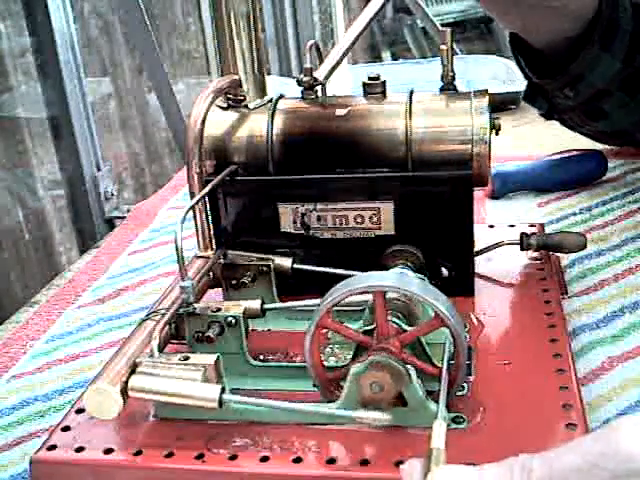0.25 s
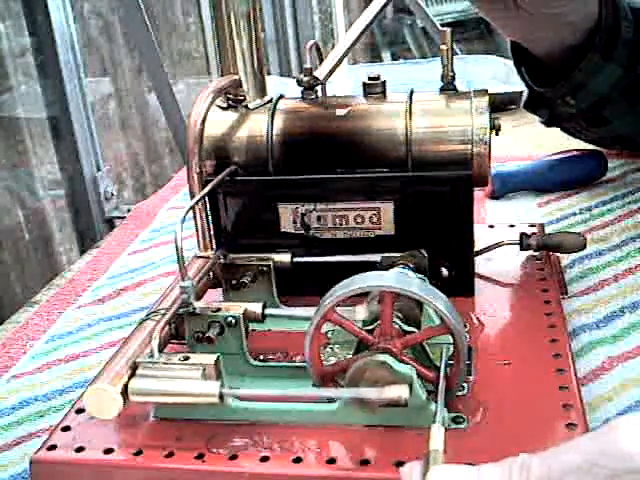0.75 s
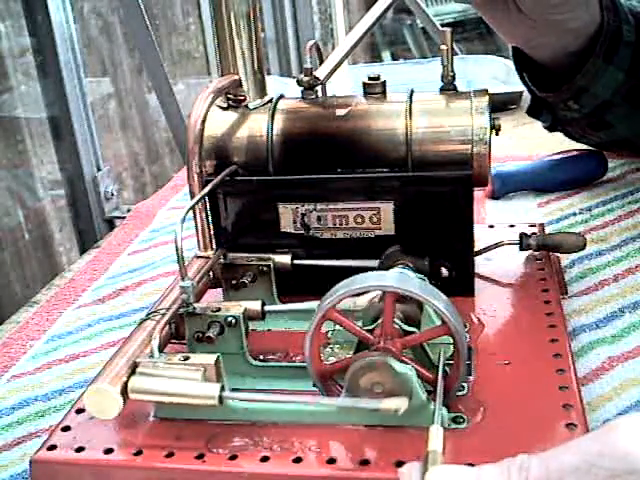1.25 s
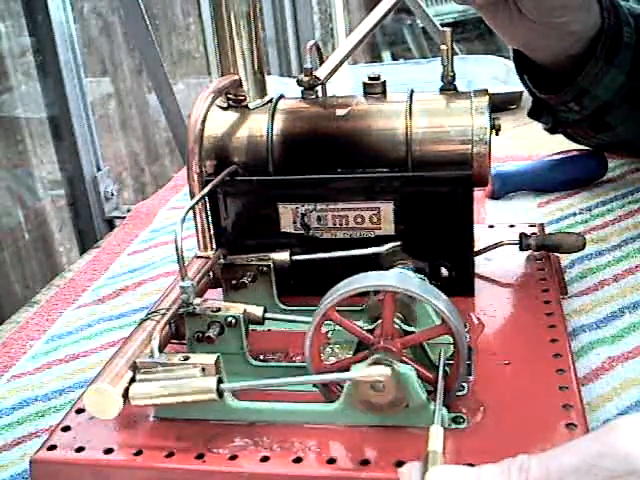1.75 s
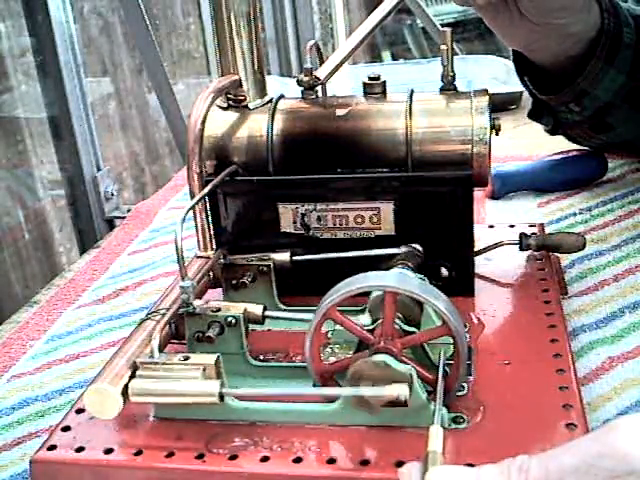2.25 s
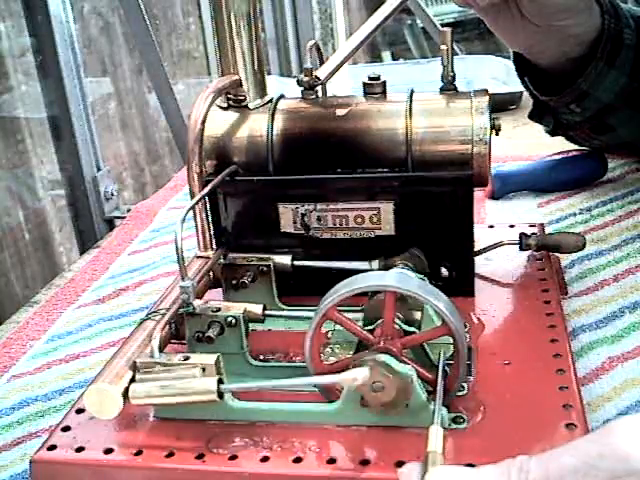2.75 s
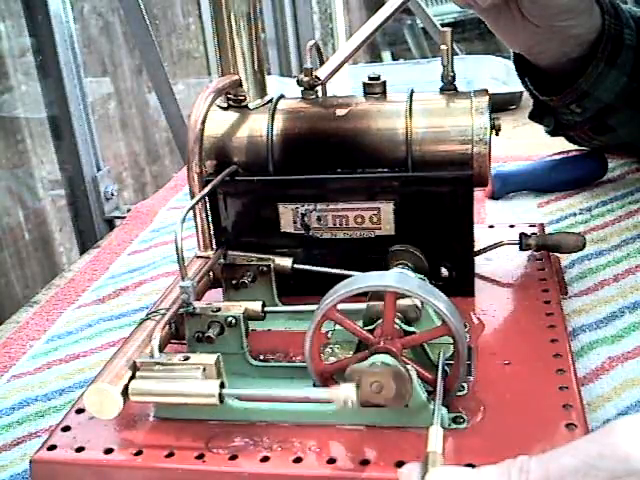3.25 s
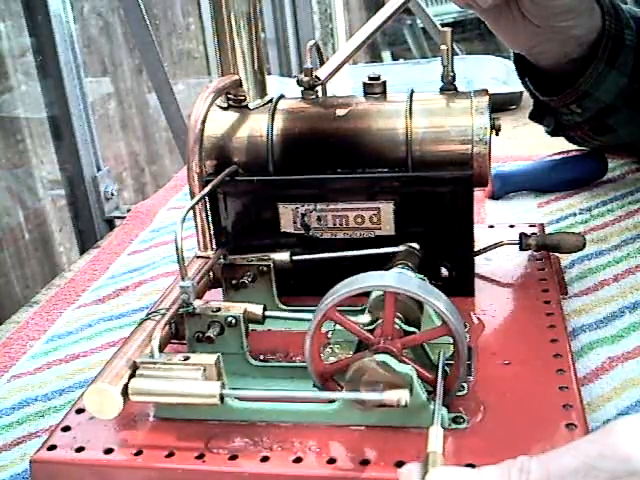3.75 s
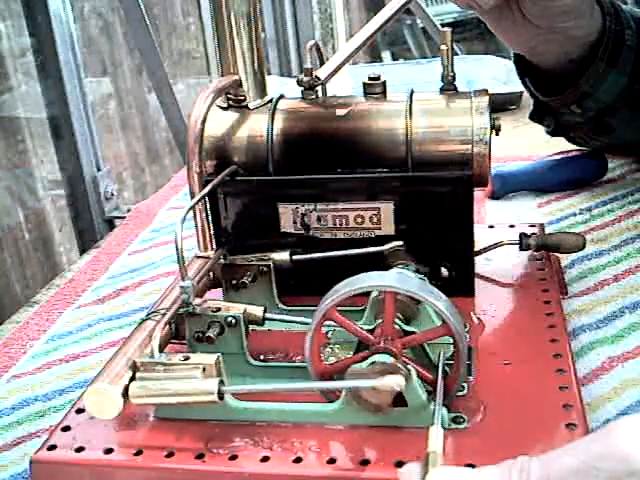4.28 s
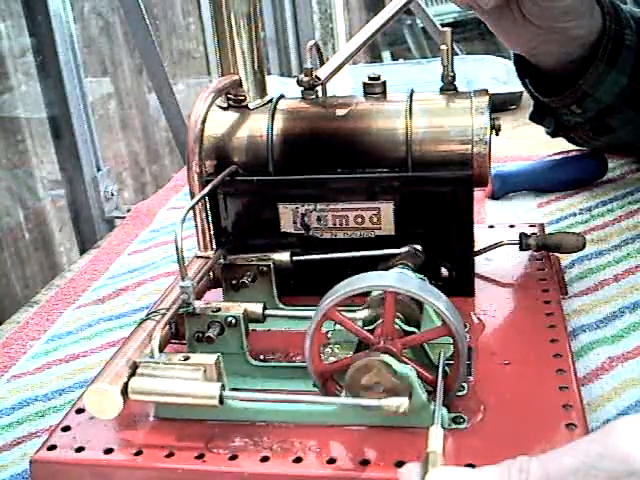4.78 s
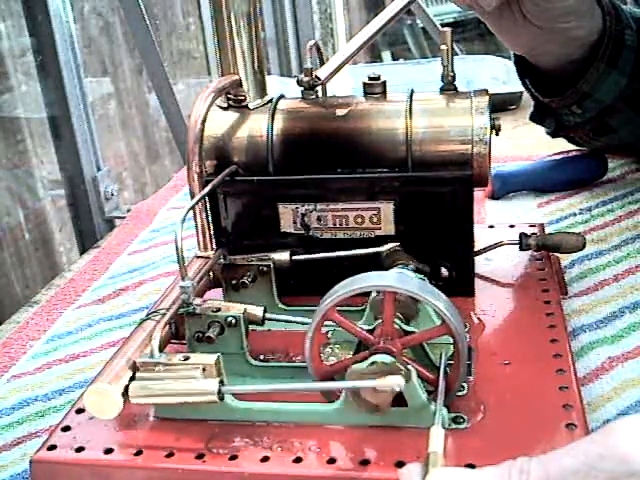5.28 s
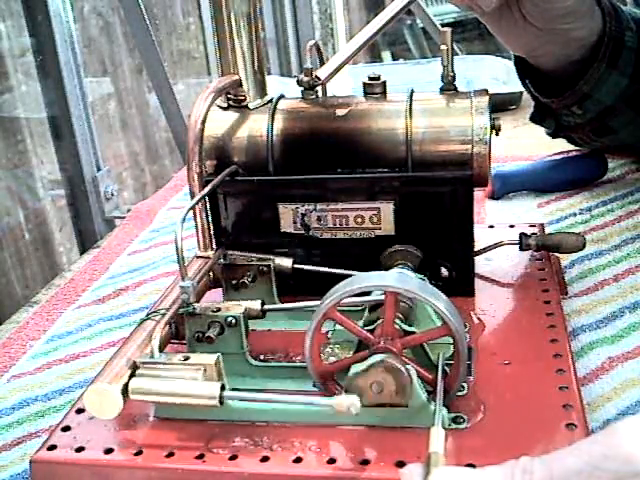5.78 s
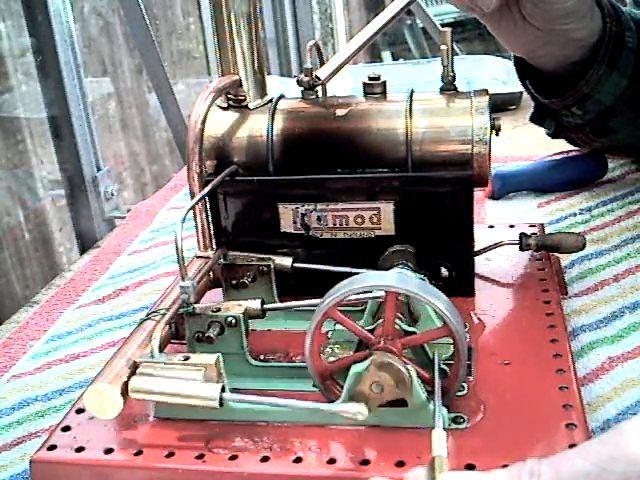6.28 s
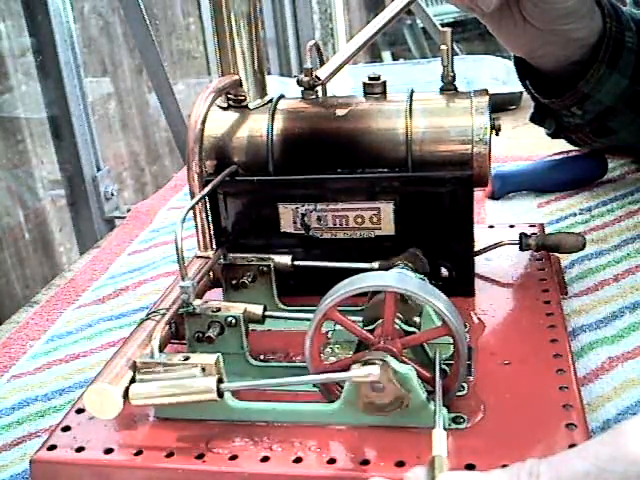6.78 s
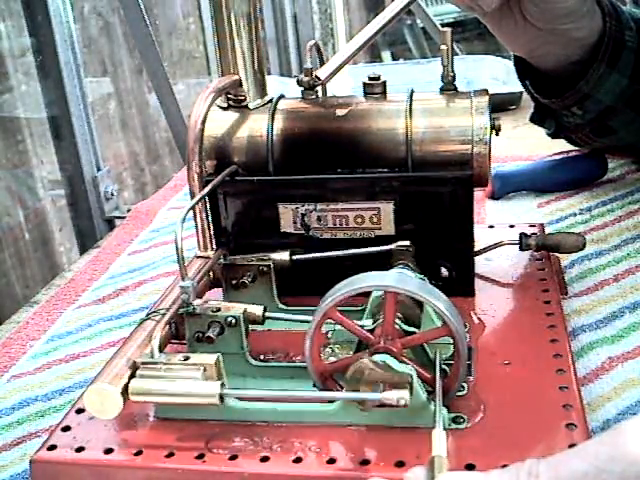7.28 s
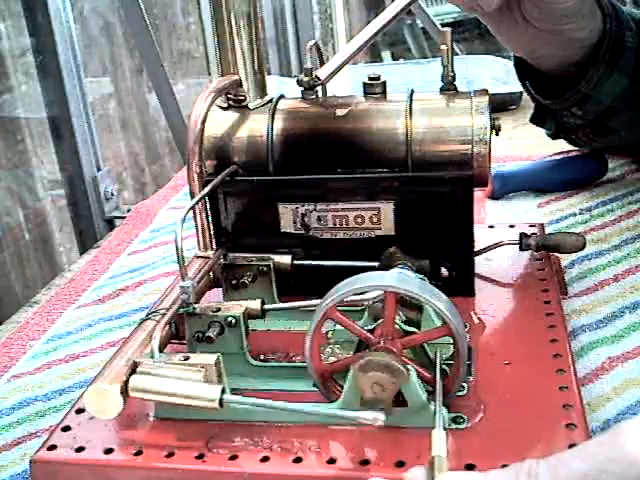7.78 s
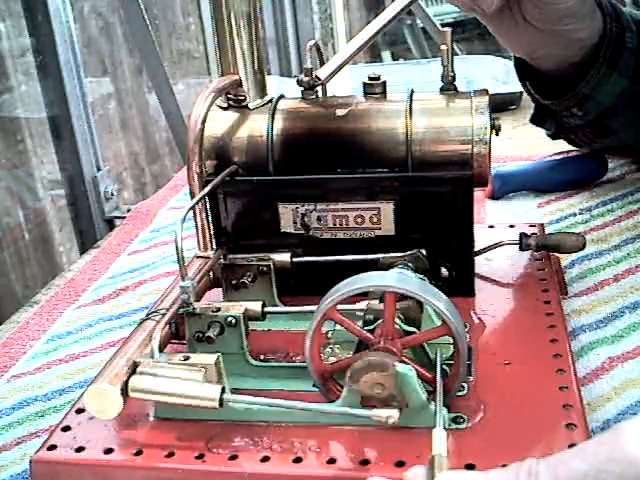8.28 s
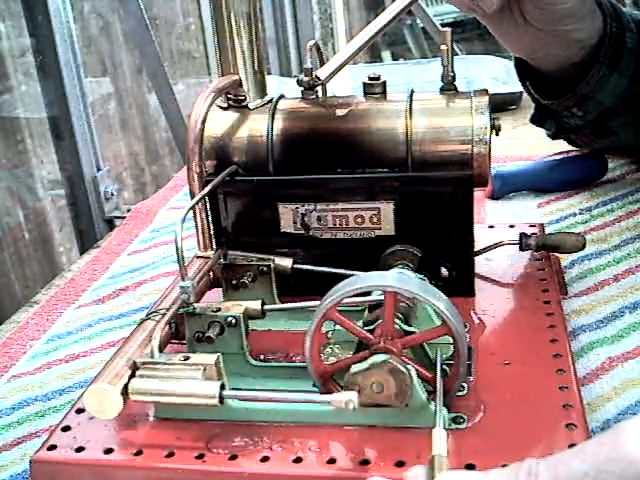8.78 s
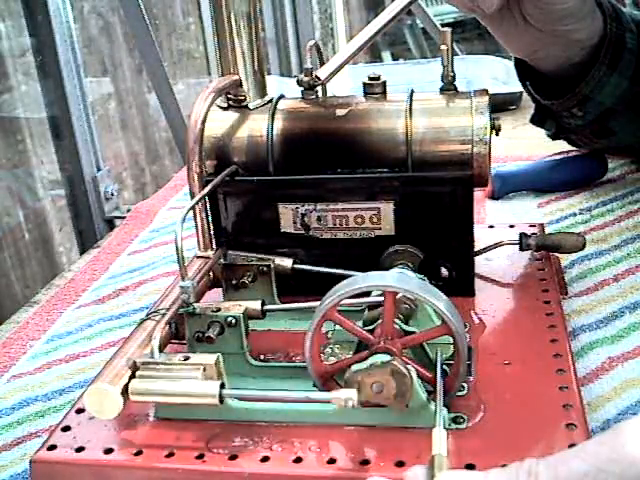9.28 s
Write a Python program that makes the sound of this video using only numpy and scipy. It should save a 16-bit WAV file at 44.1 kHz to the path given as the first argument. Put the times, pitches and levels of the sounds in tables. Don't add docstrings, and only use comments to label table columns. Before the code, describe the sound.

A toy steam engine on a sheet-metal base runs very fast at first, a loud buzzing rattle with metallic ringing and hissing steam, distorted at the close microphone. After about a second it slows continuously; the buzz breaks into rapid chugging, then separate uneven clacks and brass ticks. Soft low table thuds come near four seconds. Small dry shed.

```python
import sys
import numpy as np
from scipy import signal
from scipy.io import wavfile
from scipy.ndimage import uniform_filter1d

SR = 44100
rng = np.random.default_rng(int(sys.argv[2]) if len(sys.argv) > 2 else 0)


def store_wav(level_fs):
    pcm = np.round(np.clip(np.atleast_2d(level_fs), -1, 1) * 32767)
    wavfile.write(sys.argv[1], SR, pcm.T.astype(np.int16))


def gain_from_db(level_db):
    decades = np.asarray(level_db, float) / 20
    return 10 ** decades


N = 420271
START_TURNS, FULL_SPEED = .012, 30.5

# time_s, speed_turns_per_s
SPIN = [(0.0, 30.71), (1.06, 30.62), (1.57, 28.0), (1.98, 24.33), (2.22, 23.67), (3.1, 18.38),
        (3.72, 16.99), (4.8, 13.24), (5.0, 13.63), (5.53, 10.9), (6.13, 10.67), (6.26, 9.79), (7.11, 9.09),
        (7.48, 9.99), (8.3, 7.95), (8.65, 8.2), (8.95, 6.1), (9.53, 5.74)]
# speed_turns_per_s, head_end_turns, slide_turns, crank_end_turns
PLATE_AT = [(6, 1.01, .33, .512), (10, 1.0, .28, .505), (13, 1.025, .318, .54), (18, 1.03, .31, .59),
            (24, .995, .245, .48), (29, .97, .22, .45), (30.7, .925, .15, .5)]
# speed_turns_per_s, crosshead_turns, eccentric_turns, valve_turns
BRASS_AT = [(6, 1.032, .24, .712), (9, 1.027, .205, .697), (16.5, 1.015, .27, .673), (19, .908, .31, .665),
            (24, .9, .306, .63), (26, .872, .3, .605), (30, .83, .28, .607)]


def evened(x):
    return x / np.sqrt(np.mean(x ** 2) + 1e-20)


def curves(rows, at):
    known, *columns = np.transpose(rows)
    return [np.interp(at, known, column) for column in columns]


def spin():
    t = np.arange(N) / SR
    speed = curves(SPIN, t)[0]
    return t, speed, START_TURNS + np.cumsum(speed) / SR


def law(speed, full_db, halving_db):
    return gain_from_db(full_db + halving_db * np.log2(speed / FULL_SPEED))


def beat(places, first_db, second_db, lag_turns, width_turns, second_share=1):
    _, speed, turns = spin()
    lag, width = np.sqrt(speed / FULL_SPEED) * np.array([[lag_turns], [width_turns]])
    first, _, last = curves(places, speed)
    angle = 2 * np.pi * (turns - lag - np.array([first, last]))
    first_swell, second_swell = np.exp((np.cos(angle) - 1) / (2 * np.pi * width) ** 2)
    return evened(gain_from_db(first_db * first_swell + second_db * second_share * second_swell))


def ring(modes, rise_s):
    t = np.arange(SR // 4) / SR
    x = 0
    for hz, db, t60 in modes:
        x = x + gain_from_db(db - 60 * t / max(t60, .005)) * np.sin(2 * np.pi * hz * t)
    x = x * (1 - np.exp(-t / rise_s))
    return x / abs(x).max()


def struck(trains, bodies):
    return sum(signal.oaconvolve(x, body)[:N] for x, body in zip(trains, bodies))


def smoothed_twice(x, *sizes):
    for size, axis in sizes:
        x = uniform_filter1d(x, size=size, axis=axis)
    return evened(x)


def noise(spectrum, patchy_db, flicker_db):
    frames, hz = N // 256 + 5, np.fft.rfftfreq(1024, 1 / SR)
    real, imaginary, patches = rng.standard_normal((frames, 513, 3)).T
    patches = smoothed_twice(patches, (10, 0), (4, 1))
    flicker = smoothed_twice(rng.standard_normal(N), (130, 0), (130, 0))
    known_hz, db = np.transpose(spectrum)
    shape_db = np.interp(np.log(hz + 1), np.log(known_hz), db, left=-60, right=-60)[:, None]
    z = (real + 1j * imaginary) * gain_from_db(shape_db + patchy_db * patches)
    rush = signal.istft(z, nperseg=1024, noverlap=768)[1][:N]
    return evened(rush * gain_from_db(flicker_db * flicker))


def blows(column, places, levels):
    t, speed, turns = spin()
    whole = np.arange(-1, turns[-1])
    angle = whole + curves(places, np.interp(whole + .5, turns, speed))[column]
    angle = angle[(angle > turns[0]) & (angle < turns[-1])]
    pace = np.interp(angle, turns, speed)
    return np.interp(angle, turns, t), np.array([curves(rows, pace)[column] for rows in levels])


def strikes(places, levels, slack_turns, scatter_db, bounce_s, bounce_db):
    trains = np.zeros((len(levels), N + SR))
    for column in range(3):
        when, levels_db = blows(column, places, levels)
        luck = rng.standard_normal((len(when), 3 + len(levels))).T
        turn_s = np.gradient(when)
        slack_s = slack_turns * turn_s ** 2 * 10
        at = (abs(when + slack_s * luck[0]) * SR).astype(int)
        later = at + (abs(bounce_s + slack_s * luck[1]) * SR).astype(int)
        scatter = .5 * luck[2] + .8 * luck[3:]
        force = gain_from_db(levels_db + scatter_db * np.sqrt(turn_s / .1) * scatter)
        for train, push in zip(trains, force):
            np.add.at(train, at, push)
            np.add.at(train, later, push * gain_from_db(bounce_db))
    return trains


def plate(crack_db, crack_s):
    # pitch_hz, level_db, t60_s
    low_modes = [(417, -25.5, 0.054), (708, 0, 0.12), (767.4, 2.5, .13), (890, -6, 0.067)]
    high_modes = [(1035, -19, 0.12), (1150, -8, 0.047), (1180, -7.5, 0.015), (1234.4, 6, 0.021),
                  (1271, -4.5, 0.021), (1740, -4.5, .022), (1906, -7, 0.026), (2220, -10.5, 0.0069),
                  (2250, -5, 0.02), (2860, -11, 0.011)]
    thud_modes = [(240, 0, .016), (470, -3, .011)]
    # speed_turns_per_s, head_end_db, slide_db, crank_end_db
    low_db = [(6, -33, -36, -36), (8.03, -41, -43, -21.5), (9.5, -31.5, -31.5, -22.5),
              (12.8, -23, -36, -28.5), (17, -16, -19, -29.5), (22.1, -23, -28, -25), (23, -14, -21, -21.5),
              (28.87, -4.5, -32.5, -22), (32, -18, -29, -1.5)]
    high_db = [(6, -27.5, -29.5, -45), (7.86, -32.5, -36, -12), (10.3, -27, -54, -18.5),
               (12.4, -20.5, -23, -17), (16.9, -15.5, -13.5, -49), (21, -7.5, -32, -30),
               (23.7, -1, -21.5, -28), (27.7, -3, -15.5, -24.5), (31.13, 0, -1, -39.5)]
    thud_db = [(6, -21.5, -35, -24), (9, -17.5, -33, -17), (10.8, -12, -32.5, -23),
               (15.1, -16.5, -36.5, -23), (19.1, -21, -33, -15), (24.1, -22.5, -32, -18.5),
               (30.7, -30, -29, -26)]
    trains = strikes(PLATE_AT, (low_db, high_db, thud_db),
                     slack_turns=.004, scatter_db=1.6, bounce_s=.007, bounce_db=-18)
    bodies = ring(low_modes, .002), ring(high_modes, .006), -ring(thud_modes, .0005)
    burst = signal.oaconvolve(trains[1], np.exp(-np.arange(400) / SR / crack_s))[:N]
    crack = gain_from_db(crack_db) * burst * np.gradient(rng.standard_normal(N))
    return crack + struck(trains, bodies)


def brass(chatter_s, scrape_share):
    # pitch_hz, level_db, t60_s
    rod_modes = [(3080, -19.5, .014), (3430, -19, .014), (3998, -2.5, 0.024), (4054, -0.5, 0.022),
                 (4212, 0, 0.024), (4300, -8, 0.022)]
    pin_modes = [(4920, -4.5, 0.01), (4967, -2.5, 0.012), (5100, 2, .011), (5580, 2.5, .008),
                 (5845, 1, .011), (5830, 0.5, 0.0099)]
    # speed_turns_per_s, crosshead_db, eccentric_db, valve_db
    rod_db = [(6, -16, -26, -21.5), (9, -18.5, -21, -21.5), (12, -24.5, -40, -17), (16.6, -19.5, -25, -16),
              (18.97, -21, -34, -9), (24, -9, -39, -12.5), (28, -6.5, -30.5, -25.5), (33, -16.5, -29, -38)]
    pin_db = [(6, -13.5, -15, -14), (9, -15.5, -21.5, -15), (11.7, -19, -45, -12), (15.3, -9, -27.5, -11),
              (19.2, -8, -35, -5.5), (25.4, -10.5, -36, -0.5), (24.6, 1, -24.5, -36), (30.7, 1, -40.5, -27)]
    trains = strikes(BRASS_AT, (rod_db, pin_db),
                     slack_turns=.009, scatter_db=2.4, bounce_s=.009, bounce_db=-15)
    u = np.arange(600) / SR / chatter_s
    burst = u * np.exp(-u)
    scrape = signal.oaconvolve(trains, burst[None] / np.linalg.norm(burst), axes=1)[:, :N]
    drive = scrape_share * scrape * rng.standard_normal(scrape.shape)
    lag = round(chatter_s * SR)
    drive[:, lag:] += trains[:, :N - lag]
    return struck(drive, (ring(rod_modes, .002), ring(pin_modes, .0012)))


def shaft_hum(waver_db, hum_db, unsteady):
    # multiple_of_shaft_speed, level_db
    shaft = [(1, -9.5), (2, -10), (3, -14), (4, -22.5), (5, -23), (6, -27), (7, -23), (8, -28.5),
             (9, -31.5), (10, -35), (11, -42), (12, -37), (13, -43), (14, -46.5), (15, -46.5), (16, -48.5),
             (17, -44.5), (18, -57), (19, -46.5), (20, -48)]
    # pitch_hz, level_db
    table_top = [(25.0, -22.5), (40.0, -21), (56.0, -9.5), (70.0, -16.5), (88.0, -2.1), (105.0, -9.5),
                 (125.0, -2.5), (148.0, -2.5), (175.0, 4.5), (205.0, 2), (245.0, 12), (300.0, 7),
                 (370.0, 17.5), (460.0, 14.5)]
    t = np.arange(0, N + 32, 32) / SR
    speed = curves(SPIN, t)[0]
    order, force_db = np.transpose(shaft)[:, :, None]
    hz, answer_db = np.transpose(table_top)
    hz, answer_db = np.append(hz, 620), np.append(answer_db, 8.0)
    answer_db = np.interp(np.log(order * speed), np.log(hz), answer_db, left=-45)
    waver = evened(uniform_filter1d(rng.standard_normal(answer_db.shape), size=200))
    waver_db = waver_db * (1 + unsteady * np.log2(FULL_SPEED / speed).clip(0, .5))
    height = gain_from_db(hum_db + force_db + answer_db + waver_db * waver)
    now, _, turns = spin()
    hum = np.zeros(N)
    for k, h in zip(np.round(order), height):
        hum += np.interp(now, t, h) * np.sin(2 * np.pi * (k * turns + rng.random()))
    return hum


def loose_shaking():
    # pitch_hz, level_db, t60_s
    table_modes = [(33, -35, .1), (57, -23.5, .1), (96, -37.5, 0.085), (131.2, -4, 0.18), (183, -2, 0.078),
                   (223.3, -3, 0.058), (254.7, -1.5, 0.061), (311.5, 4.5, 0.037), (379, -0.5, 0.033),
                   (416.4, 5, 0.031), (480, 4.5, 0.016), (560, -9.5, 0.09)]
    pace = spin()[1]
    loose = 0.93 / (1 + (pace / 18.2) ** 4)
    jolts = rng.standard_normal(N) * beat(PLATE_AT, 3.0, 3.0, lag_turns=.08, width_turns=.09)
    shaking = evened(signal.oaconvolve(jolts, ring(table_modes, 0.0013))[:N])
    rocking = evened(signal.oaconvolve(rng.standard_normal(N), ring(table_modes[1:5], .004))[:N])
    crawl = law(pace, full_db=-43.5, halving_db=-8) * rocking
    return crawl + law(pace, full_db=-15, halving_db=5.37) * np.sqrt(loose) * shaking


def wash():
    # pitch_hz, level_db_per_hz
    rattle_spectrum = [(380, -11), (640, -13), (727, 0.5), (940, -12.5), (1280, 0), (1430, -8.5),
                       (1580, -8.5), (1690, -4.5), (2200, -8.5), (2700, -20.5), (3500, -22.5), (4550, -75),
                       (7700, -120)]
    steam_spectrum = [(1200, -24.5), (2000, -9), (2630, -12.5), (3320, -6.5), (3800, -8), (4110, 1),
                      (4510, -4), (5130, -3), (5820, -4.5), (6400, -22), (7200, -26.5)]
    speed = spin()[1]
    valve_share = np.clip((27. - speed) / 3, .2, 1)
    puffs = beat(BRASS_AT, 8.0, 5.5, lag_turns=.05, width_turns=.07, second_share=valve_share)
    rattle = law(speed, full_db=-11.5, halving_db=10.44)
    rattle = rattle * beat(PLATE_AT, 6.0, 4.0, lag_turns=.07, width_turns=.09)
    leak = gain_from_db(-41.5)
    steam = np.hypot(law(speed, full_db=-19.5, halving_db=14.6), leak) * puffs
    grit = gain_from_db(-3.0) * noise(rattle_spectrum, patchy_db=0.5, flicker_db=2.5)
    hiss = gain_from_db(7.5) * noise(steam_spectrum, patchy_db=1.0, flicker_db=4.0)
    return np.array([rattle * np.roll(grit, k * SR) + steam * np.roll(hiss, k * SR) for k in range(3)])


def nudges():
    # start_s, peak_db, pitch_hz
    pushes = [
        (3.704, -3, 27),
        (3.81, -8, 30.2),
        (3.89, -6, 28.3),
        (3.971, -20, 104),
    ]
    t, out = np.arange(N) / SR, np.zeros(N)
    for start_s, db, hz in pushes:
        cycles = np.maximum(t - start_s, 0) * hz
        swell = 2.0 * cycles / 0.93 * np.exp(-cycles / 0.43)
        out += gain_from_db(db) * np.sin(-2 * np.pi * cycles) * swell
    return out


def shed(x):
    # pitch_hz, t60_s
    decay = [(100, .1), (1000, .11), (6000, .06)]
    taps = np.zeros((2, SR // 2))
    at = np.arange(100, SR // 2 - 20, 20)
    at = at + rng.integers(0, 20, (2, len(at)))
    np.put_along_axis(taps, at, rng.choice([-1., 1.], at.shape), 1)
    hz, t, z = signal.stft(taps, SR, nperseg=256)
    thin = hz[:, None] / (hz[:, None] + 1500)
    fade = gain_from_db(-60 * t / curves(decay, hz)[0][:, None])
    tail = signal.istft(z * thin * fade, SR, nperseg=256)[1]
    return signal.fftconvolve(x[None], tail / np.linalg.norm(tail[0]), axes=1)[:, :N]


def scene():
    direct, *walls = wash()
    knocks = plate(crack_db=-9.5, crack_s=0.0031) + brass(chatter_s=.0016, scrape_share=.65)
    table = shaft_hum(waver_db=0.86, hum_db=2.0, unsteady=5.55) + loose_shaking()
    engine = knocks + table + direct + nudges()
    lag = 4
    left = np.concatenate([np.zeros(lag), engine[:-lag]])
    ports = np.array([left * gain_from_db(-0.83), engine * gain_from_db(0.46)])
    scattered = gain_from_db(-9) * np.array(walls)
    return ports + gain_from_db(-16.5) * shed(engine) + scattered


def roll_off(x):
    return signal.sosfilt(signal.butter(12, 20000, fs=SR, output="sos"), x)


def record(dry):
    limit = signal.firwin(201, 6450, window=("kaiser", 9), fs=SR)[None]
    flat = np.clip(signal.oaconvolve(dry, limit, "same"), -1, 1)
    spray = flat - signal.oaconvolve(flat, signal.firwin(201, 7200, fs=SR)[None], "same")
    return roll_off(flat - .55 * spray)


dry = scene()
out = record(dry)
store_wav(out)
```